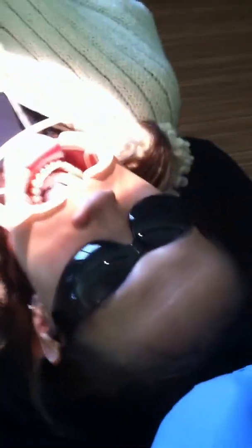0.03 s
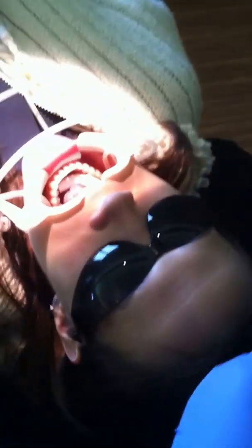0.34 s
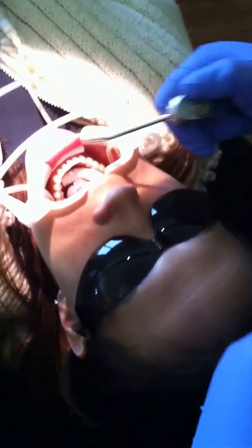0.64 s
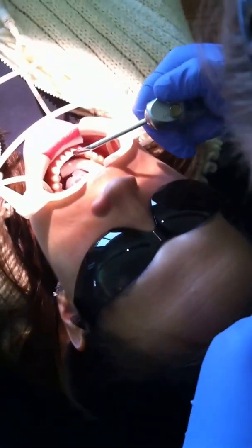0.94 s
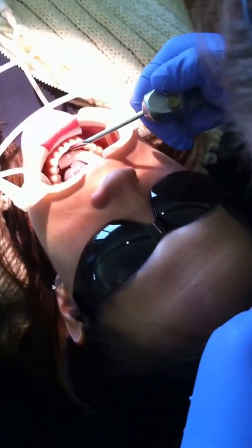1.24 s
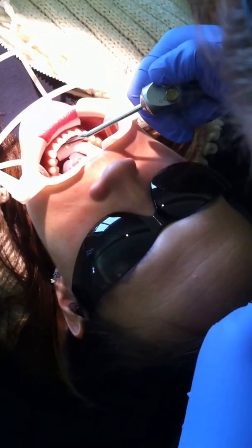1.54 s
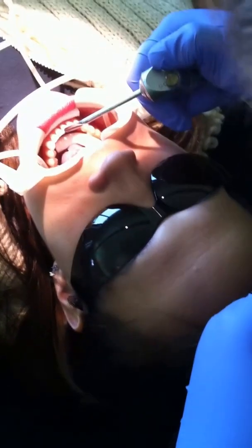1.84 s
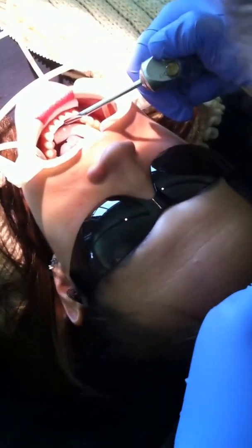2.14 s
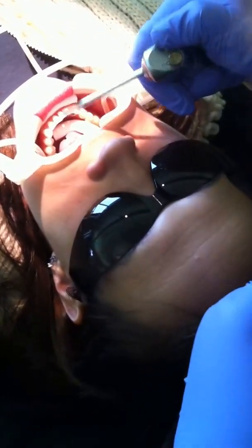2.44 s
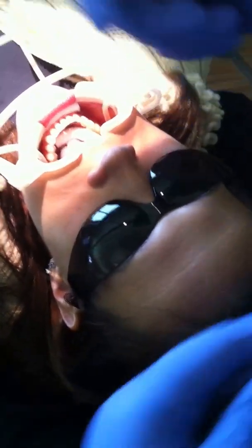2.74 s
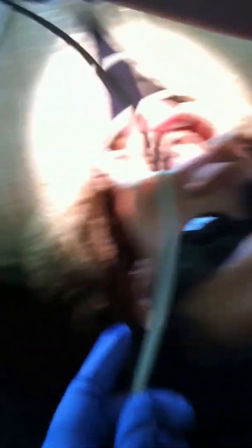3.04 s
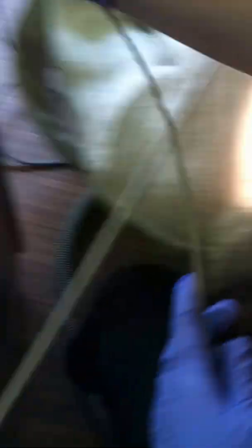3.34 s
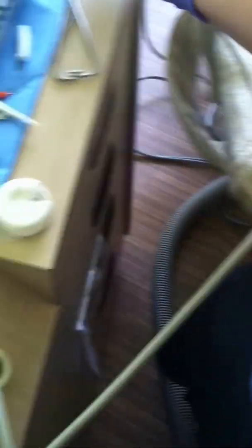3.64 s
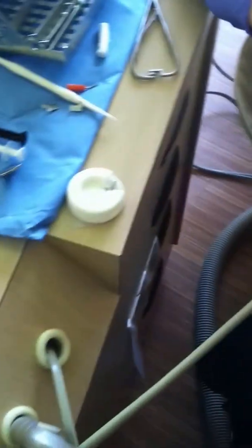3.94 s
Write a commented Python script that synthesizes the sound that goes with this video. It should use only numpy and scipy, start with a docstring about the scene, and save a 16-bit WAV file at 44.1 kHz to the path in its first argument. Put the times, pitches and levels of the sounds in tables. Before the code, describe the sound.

A dental suction tube hisses close by in a small clinic room, with water gurgling, slurping and popping. The air briefly rushes harder, then the hiss recedes as the microphone swings away, leaving a faint machine hum.

```python
"""A small clinic room: a dental suction tube hisses close by as air is drawn into its tip.
Water gurgles, slurps and pops, ringing the tube; droplets snap at the tip. Past the middle the air
rushes harder and brighter, with a soft squelch; faint narrow room resonances colour the rush.
Near the end the microphone swings away and the hiss recedes, leaving the duller room sound
and a low machine hum."""
import sys
import numpy as np
from scipy import signal
from scipy.fft import rfft, irfft
from scipy.io import wavfile
from scipy.ndimage import map_coordinates

SR = 44100
rng = np.random.default_rng(int(sys.argv[2]) if len(sys.argv) > 2 else 0)


def to_wav(sig):
    """Store sig (one row per channel, or 1-D mono) as 16-bit WAV at the path in sys.argv[1].

    Samples outside -1..1 are clipped; the rate is SR.
    """
    pcm = np.clip(np.atleast_2d(sig), -1, 1) * 32767
    pcm = np.round(pcm).astype(np.int16)
    wavfile.write(sys.argv[1], SR, pcm.T)  # frames by channels


N = 176400
TIME_S = np.arange(N) / SR
FREQ_HZ = np.fft.rfftfreq(N, 1 / SR)


def from_db(db):
    """Decibels to gain."""
    return 10 ** (np.asarray(db) / 20)


def unit_rms(x):
    """Scale to rms 1."""
    return x / np.sqrt(np.mean(x ** 2) + 1e-20)


def curves(rows):
    """One curve per column after the time column."""
    time_s, *columns = np.transpose(rows)
    return [np.interp(TIME_S, time_s, column) for column in columns]


def noise(spectrum):
    """Turbulent noise, down 40 dB an octave below the first spectrum point; rms 1."""
    first_hz, first_db = spectrum[0]
    hz, db = np.transpose([(first_hz / 2, first_db - 40), *spectrum])
    gain = from_db(np.interp(np.log(np.maximum(FREQ_HZ, 1)), np.log(hz), db))
    return unit_rms(irfft(rfft(rng.standard_normal(N)) * gain, N))


def split_bands(x, centres_hz):
    """Overlapping bands that sum to x."""
    spectrum = rfft(x)
    return [irfft(spectrum * np.interp(FREQ_HZ, centres_hz, w), N) for w in np.eye(len(centres_hz))]


def drift(rate_hz):
    """Low-passed random wander; rms 1."""
    return unit_rms(irfft(rfft(rng.standard_normal(N)) / (1 + (FREQ_HZ / rate_hz) ** 2), N))


def resonate(x, hz, width_hz):
    """Two-pole resonance, peak gain 1."""
    r = np.exp(-np.pi * width_hz / SR)
    poles = [1, -2 * r * np.cos(2 * np.pi * hz / SR), r * r]
    return signal.lfilter(np.array([1, 0, -1]) * (1 - r * r) / 2, poles, x + 1e-18)


def body(x, modes):
    """Parallel resonances, each applied twice for steep sides; signs alternate."""
    return sum((-1) ** k * from_db(db) * resonate(resonate(x, hz, width_hz), hz, width_hz)
               for k, (hz, width_hz, db) in enumerate(modes))


def narrow_noise(hz, width_hz):
    """Noise in one resonance; rms 1."""
    return unit_rms(body(rng.standard_normal(N), [(hz, width_hz, 0)]))


def gliding_noise(hz, width_hz):
    """Noise band whose centre follows a curve; rms about 1."""
    phase = 2 * np.pi * np.cumsum(hz) / SR
    return drift(width_hz / 2) * np.sin(phase) + drift(width_hz / 2) * np.cos(phase)


def grains(per_s, spread_db):
    """Random clicks of uneven size."""
    sizes = from_db(spread_db * np.minimum(rng.exponential(1, N), 4))
    return (rng.random(N) < per_s / SR) * sizes * rng.choice([-1, 1], N)


def trapezoid(start_s, end_s, attack_s, release_s):
    """Gate with linear edges."""
    return np.clip(np.minimum((TIME_S - start_s) / attack_s, (end_s - TIME_S) / release_s), 0, 1)


def arch(centre_s, half_length_s):
    """Half-cosine swell."""
    return np.cos(np.pi / 2 * np.clip((TIME_S - centre_s) / half_length_s, -1, 1))


# Ventilation spectrum: freq_hz, relative_db
VENT_SPECTRUM = [(25, -16), (50, -32), (75, -21), (100, -11.5), (160, -3), (205, 2.5), (265, -2),
                 (340, -2.5), (420, -4.5), (600, -7.5), (820, -9.5), (980, -7.5), (1500, -20),
                 (2500, -36.5)]
# Room-returned hiss spectrum: freq_hz, relative_db
DIFFUSE_SPECTRUM = [(820, -24), (1400, -22), (1640, -33), (2020, -22.5), (2720, -16), (3330, -15),
                    (4240, -7.5), (5180, -17.5), (9490, -20.5), (10300, -18.5), (12500, -27), (13000, -28),
                    (15500, -32)]


def room(diffuse_db=-55.5, vent_db=-63.5):
    """Steady diffuse hiss and ventilation noise."""
    return from_db(diffuse_db) * noise(DIFFUSE_SPECTRUM) + from_db(vent_db) * noise(VENT_SPECTRUM)


# Machine partials: pitch_hz, rms_db
HUM_PARTIALS = [(119.8, -78), (296.5, -72.5), (339, -77.5)]


def machine_hum(waver_db=3.5, waver_rad=0.53):
    """Low tones wavering in level and phase."""
    hum = np.zeros(N)
    for hz, db in HUM_PARTIALS:
        amplitude = np.sqrt(2) * from_db(db + waver_db * drift(rate_hz=4.6))
        hum += amplitude * np.sin(2 * np.pi * hz * TIME_S + waver_rad * drift(rate_hz=1.4))
    return hum


# Wet tube resonances: freq_hz, width_hz, gain_db
TUBE_MODES = [(1157, 194, 1), (1289, 135, -4), (1552, 465, -9.5)]


def bubbling(rms, per_s, spread_db):
    """A stream of bubbles rings the tube."""
    bubbles = grains(per_s, spread_db)
    return body(bubbles * rms, TUBE_MODES) / body(bubbles, TUBE_MODES).std()


# Gurgle envelope: time_s, rms_db
GURGLE_LEVELS = [(0, -55), (.8, -54.5), (1.1, -56.5), (1.45, -55.5), (2, -55), (2.4, -55.5), (2.7, -55.5),
                 (2.98, -52), (3.2, -59), (3.4, -64.5), (3.55, -59.5), (4, -62)]
# Water slurps: start_s, length_s, rms_db
SLURP_BURSTS = [(-0.004, 0.098, -42.6), (0.14, 0.11, -46.5), (0.245, 0.06, -49.5), (0.396, 0.16, -49.5),
                (0.566, 0.012, -44)]


def water(edge_s=0.0041):
    """Continuous gurgle plus slurps of denser bubbles."""
    gurgle_db, = curves(GURGLE_LEVELS)
    gurgle = bubbling(from_db(gurgle_db), per_s=1100, spread_db=1)
    slurp_rms = sum(from_db(db) * trapezoid(start_s, start_s + length_s, edge_s, edge_s)
                    for start_s, length_s, db in SLURP_BURSTS)
    return gurgle + bubbling(slurp_rms, per_s=3500, spread_db=2.2)


# Lone bubbles in the tube: start_s, pitch_hz, peak_db
BUBBLE_POPS = [(0.451, 1265, -36), (1.407, 1150, -37), (1.8795, 1210, -35), (2.353, 1340, -35),
               (2.371, 1236, -30.5), (2.945, 1200, -40)]


def pops(rise_s=0.0024):
    """Each bubble rings up and dies within a few cycles."""
    blips = np.zeros(N)
    for start_s, hz, db in BUBBLE_POPS:
        age_s = np.maximum(TIME_S - start_s, 0)
        rise = age_s / rise_s
        blips += from_db(db) * (rise * np.exp(1 - rise)) ** 2 * np.sin(2 * np.pi * hz * age_s)
    return blips


# Falling wet resonance: time_s, pitch_hz, level_db
SQUELCH_PATH = [(2.09, 2250, -62), (2.135, 2190, -55), (2.19, 1990, -55), (2.215, 1860, -58),
                (2.24, 1770, -51.5), (2.28, 1750, -68)]


def squelch(gulp_db=-57):
    """A wet resonance slides down, with a low gulp near its end."""
    hz, db = curves(SQUELCH_PATH)
    gate = (TIME_S > SQUELCH_PATH[0][0]) & (TIME_S < SQUELCH_PATH[-1][0])
    slide = from_db(db) * gliding_noise(hz, width_hz=69) * gate
    gulp = arch(centre_s=2.225, half_length_s=0.053) * narrow_noise(hz=660, width_hz=540)
    return slide + from_db(gulp_db) * gulp


# Tip resonances: freq_hz, width_hz, gain_db
TIP_MODES = [(3520, 1300, 0), (4370, 1200, 19), (6660, 2900, -1)]
# Droplets at the tip: start_s, peak_db
DROPLET_SNAPS = [(.8485, -34), (2.637, -39), (3.144, -31), (3.1995, -29), (3.313, -38), (3.332, -38),
                 (3.349, -41)]


def snaps():
    """Single droplets ring the tip."""
    clicks = np.zeros(N)
    for start_s, db in DROPLET_SNAPS:
        clicks[int(start_s * SR)] += from_db(db)
    impulse_peak = np.abs(body(signal.unit_impulse(SR), TIP_MODES)).max()
    return body(clicks, TIP_MODES) / impulse_peak


def spatter():
    """Fine droplets patter on the tip; rms 1."""
    return unit_rms(body(grains(per_s=380, spread_db=-0.5), TIP_MODES))


# Passing resonances: centre_s, half_length_s, pitch_hz, glide_hz_per_s, width_hz, level_db
HISS_COLOURS = [(2.452, 0.077, 2706, -800, 500, -53), (2.74, 0.1, 3400, -0.5, 220, -54),
                (3.0, .17, 6870, -700, 520, -55.5), (3.12, 0.11, 5430, 2000, 1310, -50),
                (3.189, 0.17, 3685, 800.5, 480, -50), (3.21, 0.21, 1615, 0, 340, -62),
                (3.276, 0.12, 2566, -500, 230, -61), (3.33, 0.26, 10830, 2, 800, -56),
                (3.46, 0.23, 8580, 999.5, 900, -57.5), (3.48, 0.14, 4180, 400.5, 150, -59),
                (3.616, 0.058, 4620, 1001, 150, -58), (3.617, .1, 6270, 1000, 320, -61.5)]


def passing_colours():
    """Noise bands swell, glide and fade in the hiss as things are moved."""
    bands = np.zeros(N)
    for centre_s, half_s, hz, glide_hz_per_s, width_hz, db in HISS_COLOURS:
        path_hz = hz + glide_hz_per_s * np.clip(TIME_S - centre_s, -half_s, half_s)
        bands += from_db(db) * arch(centre_s, half_s) * gliding_noise(path_hz, width_hz)
    return bands


# Hard airflow spectrum: freq_hz, relative_db
RUSH_SPECTRUM = [(470, -59), (800, -19), (1270, -0.5), (1450, -30), (1770, -22), (2270, -14), (2440, -27),
                 (2630, -20), (3460, -6.5), (4020, -19), (4440, -1.5), (5550, -7.5), (7020, 2.5), (8250, 3),
                 (8600, -2), (9700, 4), (11100, 0), (15500, -17)]
# Narrow room resonances in the rush: freq_hz, width_hz, relative_db
RUSH_RESONANCES = [(4410, 60, -5), (4510, 60, -5), (4510, 60, -5), (6490, 60, -3), (6940, 50, -3),
                   (7075, 50, -2), (8305, 30, -5), (8955, 35, -4), (9425, 30, -5), (9535, 40, 0),
                   (9825, 45, -1)]


def rush(air_db=-36, resonance_db=-50.5, top_gain_db=-3.5, fade_start_s=2.3, fade_db_per_s=41):
    """Air swells for half a second; the top band fades first."""
    swell = trapezoid(start_s=2.016, end_s=2.528, attack_s=0.12, release_s=0.083)
    resonances = sum(from_db(db) * narrow_noise(hz, width_hz) for hz, width_hz, db in RUSH_RESONANCES)
    air = from_db(air_db) * noise(RUSH_SPECTRUM) + from_db(resonance_db) * resonances
    low, top = split_bands(air, centres_hz=[7056, 8652])
    fade_db = fade_db_per_s * np.maximum(TIME_S - fade_start_s, 0)
    return swell * (low + top * from_db(top_gain_db - fade_db))


# Paths via nearby surfaces: delay_ms
ECHO_DELAYS_MS = [0.9, 1.9, 2.4, 2.85, 4.5, 6.2, 8.3, 11.4]


def reflections(x, gain=0.074, sway_ms=0.058, swing_start_s=2.7, swing_ms_per_s=-0.35):
    """Weak echoes; delays sway, then slide as the microphone swings away."""
    swing_ms = swing_ms_per_s * np.maximum(TIME_S - swing_start_s, 0)
    delays_ms = [ms + swing_ms + sway_ms * drift(rate_hz=1.65) for ms in ECHO_DELAYS_MS]
    return gain * sum(map_coordinates(x, [(TIME_S - ms / 1000) * SR], order=3) for ms in delays_ms)


# Intake air spectrum: freq_hz, relative_db
HISS_SPECTRUM = [(820, -38), (1400, -10), (1490, -17), (1760, -12), (1930, -15.5), (2270, -16), (2500, -11),
                 (2620, -13.5), (3100, -8.5), (3570, -2.5), (3940, -3), (4170, 0.5), (4590, 0), (4900, -6),
                 (5150, -4.5), (6020, -8), (6450, -6), (6950, -6.5), (7650, -11), (8600, -10.5),
                 (9100, -9.5), (9900, -18.5), (10400, -12.5), (10700, -13), (11100, -8), (11500, -7.5),
                 (12120, -19), (12500, -13.5), (15500, -25)]
# Tip singing in the airflow: pitch_hz, width_hz, base_db
TIP_SINGING = [(3505, 127, -58.5), (4410, 130, -61.5), (4578, 81, -57)]
# Hiss bands, low to top: centre_hz
BAND_CENTRES_HZ = [2180, 4200, 6900, 9100, 13000]
# Hiss band gains: time_s, low_db, middle_db, upper_db, treble_db, top_db
BAND_GAINS = [(0, 3, 1.5, 2.5, 5.5, -1), (.3, -1, 0.5, 0, 0.5, -1.5), (.48, 5, 0, 4.5, 3.5, 0),
              (.62, 0, -1, -2, 1.5, -0.5), (1.2, 1, -1.5, 0.5, 0, -0.5), (1.8, 2.5, 1, 3, 0, 1),
              (2.05, 5.5, 1, 5, 4.5, 2), (2.42, 10.5, 2.5, 6, 3, 1), (2.66, 0.5, 2, 1.5, 2, 1),
              (2.79, 0, -5.5, -1.5, 2, 1), (3.02, 0.5, -3.5, 1.5, 2, 0), (3.19, -3, -3.5, -3, 1.5, 0),
              (3.3, -3.5, -2, -2.5, -2, -1), (3.44, -7.5, -3, -3.5, 4.5, -4), (3.56, -14, -18, -12, -5, -6),
              (3.75, -22, -12, -15, -8, -22), (4, -29, -12, -31, -28, -30)]


def suction(hiss_base_db=-44.5, spatter_base_db=-62, flutter_db=0.66):
    """Air drawn into the tip flutters, sings faintly and spatters; nearby surfaces reflect it."""
    gains_db = curves(BAND_GAINS)
    flow = from_db(hiss_base_db) * noise(HISS_SPECTRUM)
    flow += sum(from_db(db) * narrow_noise(hz, width_hz) for hz, width_hz, db in TIP_SINGING)
    air = sum(from_db(db) * band for db, band in zip(gains_db, split_bands(flow, BAND_CENTRES_HZ)))
    droplets = from_db(spatter_base_db + gains_db[1]) * spatter()  # follows the middle band
    direct = air * from_db(flutter_db * drift(rate_hz=22)) + droplets
    return direct + reflections(direct)


def scene():
    """All sources, mono."""
    tip = suction() + snaps() + passing_colours() + rush()
    tube = squelch() + water() + pops()
    return (tip + tube + room() + machine_hum())[None]


def record(dry, cutoff_hz=15620):
    """Steep elliptic low-pass."""
    return signal.sosfilt(signal.ellip(12, .1, 80, cutoff_hz, fs=SR, output="sos"), dry)


dry = scene()
out = record(dry)
to_wav(out)
```